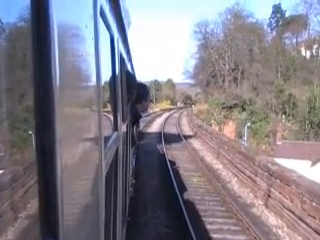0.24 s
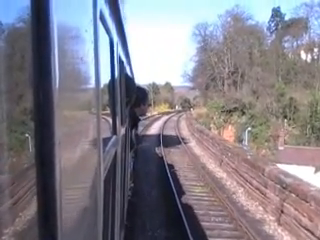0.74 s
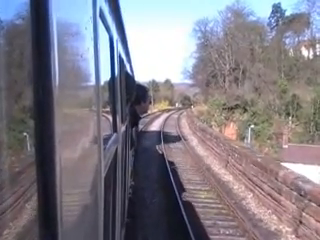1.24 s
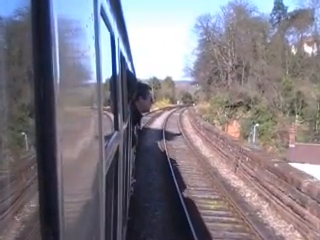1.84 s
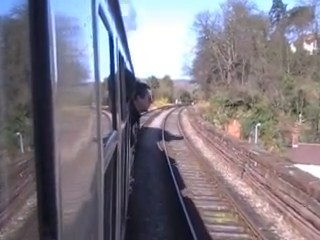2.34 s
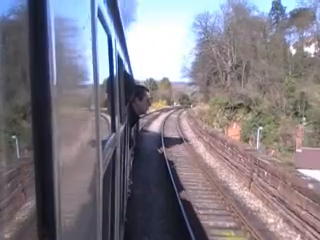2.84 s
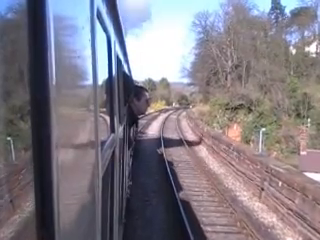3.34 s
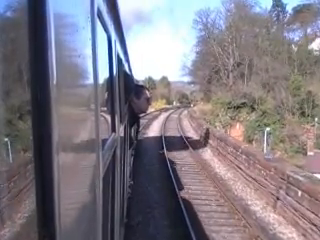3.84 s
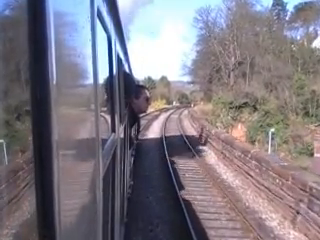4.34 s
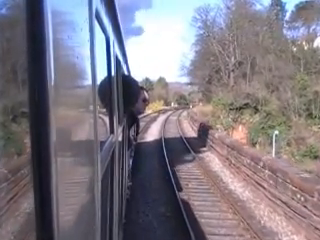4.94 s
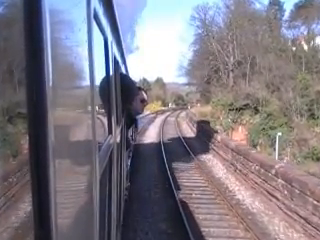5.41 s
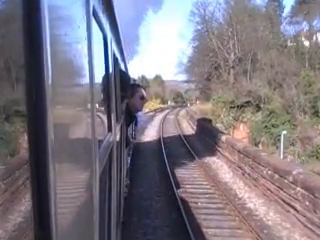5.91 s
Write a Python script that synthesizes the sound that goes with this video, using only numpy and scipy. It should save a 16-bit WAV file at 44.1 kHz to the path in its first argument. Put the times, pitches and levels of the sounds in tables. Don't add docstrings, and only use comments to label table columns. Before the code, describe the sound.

Steam locomotive exhaust beats chuff loudly and steadily, slightly quickening, with steam hiss between, low train rumble and wind buffeting the microphone.

```python
import sys
import numpy as np
from scipy import signal
from scipy.fft import rfft, irfft, next_fast_len
from scipy.io import wavfile
from scipy.ndimage import uniform_filter1d

SR = 44100
rng = np.random.default_rng(int(sys.argv[2]) if len(sys.argv) > 2 else 0)


def master_out(mix):
    frames = np.transpose(np.atleast_2d(mix))
    ceiling = np.clip(frames, -1, 1)
    pcm = np.round(ceiling * 32767).astype(np.int16)
    wavfile.write(sys.argv[1], SR, pcm)


def attenuation_scalar(level_db):
    decades = np.asarray(level_db, float) / 20
    return 10 ** decades


N = 272097
TIME = np.arange(N) / SR
SIZE = next_fast_len(N + SR // 10)
HZ = np.maximum(np.arange(SIZE // 2 + 1) * SR / SIZE, 1)


def rms_one(x):
    return x / np.sqrt(np.mean(x ** 2) + 1e-20)


def in_time(rows):
    s, *columns = np.transpose(rows)
    return [np.interp(TIME, s, c) for c in columns]


def in_pitch(rows):
    hz, *columns = np.transpose(rows)
    return [np.interp(np.log(HZ), np.log(hz), c) for c in columns]


def coloured(x, gain):
    return irfft(rfft(x, SIZE) * gain, SIZE)[..., :N]


def around(s, reach):
    first = max(int((s - reach) * SR), 0)
    last = min(int((s + reach) * SR), N)
    span = slice(first, last)
    return span, TIME[span] - s


def swell(s, rise, hold, fall):
    span, late = around(s, hold + .4)
    return span, 1 / (np.exp(-late / rise) + 1) / (np.exp((late - hold) / fall) + 1)


def drift(rate):
    r = np.exp(-2 * np.pi * rate / SR)
    white = rng.standard_normal(N + SR)
    return rms_one(signal.lfilter([1], [1, -2 * r, r * r], white)[SR:])


def turbulence(spectrum, flutter_db, rate):
    white = rng.standard_normal(N) * attenuation_scalar(flutter_db * drift(rate))
    return rms_one(coloured(white, attenuation_scalar(in_pitch(spectrum)[0])))


def resonate(x, modes):
    out = 0
    for k, (hz, width_hz, db) in enumerate(modes):
        r = np.exp(-np.pi * width_hz / SR)
        top = (1 - r * r) / 2 * np.array([1, 0, -1])
        bottom = [1, -2 * r * np.cos(2 * np.pi * hz / SR), r * r]
        out = out + (-1) ** k * attenuation_scalar(db) * signal.lfilter(top, bottom, x)
    return out


# t/s, swell/s, low blast level/dB, jet hiss level/dB
BEATS = [(0.132, 0.035, -17, -12.5), (0.582, 0.042, -14, -15.5), (1.013, 0.02, -13, -14),
         (1.496, 0.022, -13.5, -17.5), (1.921, 0.032, -16, -11.5), (2.336, 0.024, -13, -17.5),
         (2.763, 0.022, -11.5, -16.5), (3.212, 0.02, -13.5, -15.5), (3.643, 0.029, -15.5, -15.5),
         (4.026, 0.03, -14, -13), (4.423, 0.025, -10.5, -15), (4.861, 0.031, -14.5, -13),
         (5.259, 0.025, -12.5, -12.5), (5.644, 0.038, -14, -16.5), (6.023, 0.027, -11.5, -14.5)]
# t/s, roar level/dB
PUFFS = [
    (0.666, -30.5),
    (.865, -22),
    (1.76, -21.5),
    (2.259, -32.5),
    (3.046, -23),
    (3.105, -31.5),
    (3.44, -27.5),
    (5.062, -26),
    (5.134, -12.5),
]
# f/Hz, width/Hz, level/dB
CHIMNEY = [(204.7, 17, -2.5), (349.3, 25, -1), (574, 82, -16), (707, 23, 1), (860, 210, -9),
           (1134, 25, -2.5), (1306, 27, -9.5)]
# f/Hz, level/dB per Hz
BOOM = [(90, -62), (140, 4.5), (200, 10), (450, 8), (700, 3.5), (1500, -24.5)]
# f/Hz, level/dB per Hz
ROAR = [(200, -22.5), (450, -7.5), (800, -6), (1400, -1.5), (2100, -5.5), (3000, -10.5), (6000, -59)]
# f/Hz, level/dB per Hz
JET = [(1200, -9), (2200, -8), (2800, -0.5), (3500, 5.5), (4100, -2), (5000, -5.5), (5600, -14.5),
       (6300, -1), (6800, -24), (7300, -55.5), (8500, -32), (12000, -53)]
# f/Hz, level/dB per Hz
SIZZLE = [(5500, -21), (6500, 4.5), (7500, 0.5), (8800, -5.5), (10000, -8), (12000, -17)]


def exhaust():
    blasts = []
    for s, rise, low_db, hiss_db in BEATS:
        fade = 0.036 - 0.0017 * s
        blasts.append((s, rise, fade, low_db + 0.44, low_db, hiss_db))
    for s, roar_db in PUFFS:
        blasts.append((s, 0.0053, 0.019, roar_db - 8, roar_db, roar_db - 9.5))
    drive = np.zeros((3, N))
    lag_s = np.array([[0.0035], [0], [0]])
    for s, rise, fade, *levels_db in blasts:
        span, late = around(s, .4)
        late = late - lag_s
        drive[:, span] += attenuation_scalar(levels_db)[:, None] / (np.exp(-late / rise) + np.exp(late / fade))
    boom = turbulence(BOOM, flutter_db=1.0, rate=180)
    roar = turbulence(ROAR, flutter_db=1.5, rate=32)
    jet = turbulence(JET, flutter_db=1.37, rate=150)
    jet = jet + attenuation_scalar(-26.5) * turbulence(SIZZLE, flutter_db=2.5, rate=30)
    low = drive[0] * boom + drive[1] * roar
    return attenuation_scalar(-5.5) * low + attenuation_scalar(8.5) * resonate(low, CHIMNEY) + attenuation_scalar(0.77) * drive[2] * jet


# t/s, level/dB
LEAK = [(0.0, -34.5), (0.45, -33.5), (0.75, -39.5), (1.05, -36.5), (1.35, -42), (2.2, -33.5), (2.55, -37.5),
        (3.1, -37.5), (3.85, -33.5), (4.2, -35.5), (4.75, -36), (5.5, -32.5), (5.8, -36.5), (6.17, -36.5)]


def leaking_steam():
    flow_db, = in_time(LEAK)
    blow_db = np.zeros(N)
    for s, *_ in BEATS[::4]:
        span, late = around(s - 0.14, 0.48)
        blow_db[span] += 2 * 5 / (np.exp(-late / 0.13) + np.exp(late / 0.058))
    change_db = flow_db + 36
    hiss_db = flow_db + blow_db
    roar_db = -37 + 0.21 * change_db + 1.07 * blow_db
    sizzle_db = -51 + 0.97 * change_db + 0.66 * blow_db
    hiss = attenuation_scalar(hiss_db - 0.67) * turbulence(JET, flutter_db=1.55, rate=6.4)
    sizzle = attenuation_scalar(sizzle_db) * turbulence(SIZZLE, flutter_db=.4, rate=20)
    roar = attenuation_scalar(roar_db - 1.5) * turbulence(ROAR, flutter_db=0.5, rate=4.5)
    return hiss + sizzle + roar


# f/Hz, level/dB per Hz
RUMBLE = [(40, -21.5), (100, -11.5), (150, 6.5), (205, 7), (300, 8), (600, 3.5), (900, -1), (1500, -35.5)]
# f/Hz, width/Hz, level/dB
CARRIAGE = [(202.3, 7.9, 9), (363.2, 22, 7), (619, 18, 3.5)]


def train_rumble():
    rumble = attenuation_scalar(-35.5) * turbulence(RUMBLE, flutter_db=-1.5, rate=22)
    return rumble + resonate(rumble, CARRIAGE)


# t/s, peak level/dB, f/Hz, decay/s
TICKS = [
    (.094, -27, 7000, .008),
    (1.645, -33, 8000, .005),
    (4.57, -35, 9500, .003),
    (5.131, -21, 1400, .025),
]


def ticks():
    out = np.zeros(N)
    for s, peak_db, hz, decay in TICKS:
        span, late = around(s, 0.036)
        grit = resonate(rng.standard_normal(len(late)), [(hz, .5 * hz, 6)])
        out[span] += attenuation_scalar(peak_db) * grit * (late > 0) * np.exp(-np.abs(late) / decay)
    return out


# t/s, hold/s, buffeting level/dB, left-right level/dB
GUSTS = [(.08, 0.075, -28, -2), (0.347, 0.17, -23.5, 5), (0.539, .13, -24, -5.5), (0.822, .1, -20, 0.5),
         (0.943, 0.031, -21.5, 2), (0.998, 0.14, -32, 13), (1.23, 0.064, -33.5, 5), (1.411, 0.094, -28, -2),
         (1.698, .13, -29.5, 4.5), (1.87, .04, -31, -9), (2.078, 0.035, -29.5, 13.5),
         (2.153, 0.038, -21.5, 0), (2.708, 0.11, -28, -7.5), (3, 0.13, -25, -3), (3.198, 0.13, -26.5, -1),
         (3.383, 0.078, -26, 12), (3.574, 0.13, -24.5, -3.5), (4.232, 0.11, -33.5, 1),
         (4.406, 0.054, -36.5, 12), (4.615, 0.036, -32, -5), (4.825, 0.081, -40, 9), (5.1, 0.048, -25.5, 0),
         (5.25, 0.081, -39, -4), (5.47, 0.038, -32.5, -6), (5.674, 0.041, -37.5, 0), (5.96, .05, -33.5, 8)]
# t/s, peak level/dB, left-right level/dB, push or pull (+1 or -1)
POPS = [(0.421, -8, 10, 1), (0.557, -5, 14, -1), (0.854, -18, 10, 1), (1.013, -7, 26, -1),
        (1.08, -11, 7, -1), (1.777, -16.5, 26, 1), (2.082, -20, 11, 1), (2.814, 2, 24, 1),
        (3.058, -29, 20, -1), (3.275, -10, 26, -1), (3.337, -5.5, 23, 1), (3.414, -15.5, -14, -1),
        (3.431, -9, 18, 1), (4.236, -16, 19, 1), (5.84, -12.5, 15, -1)]
# f/Hz, level/dB per Hz
BUFFET = [(25, -54), (60, -25), (120, -1), (230, 3.5), (400, 3), (800, -4), (1300, -13), (2500, -41.5)]
# f/Hz, level/dB per Hz
PUSH = [(20, -39.5), (40, -14), (70, -4.5), (120, -0.5), (170, -11), (300, -33.5)]


def wind():
    calm = attenuation_scalar(-40.5 - 1.5 * TIME)
    level = np.array([calm, calm])
    for s, hold, db, side_db in GUSTS:
        span, shape = swell(s, .012, hold, 0.021)
        level[:, span] += np.outer(attenuation_scalar(db + np.array([.5, -.5]) * side_db), shape)
    lumps = np.array([turbulence(BUFFET, flutter_db=3.3, rate=70) for port in range(2)])
    push = np.array([turbulence(PUSH, flutter_db=4.5, rate=5.7) for port in range(2)])
    push = attenuation_scalar(-25.5) * level.mean(axis=0) ** .6 * push
    push = push + 0.41 * push[::-1]
    out = lumps * level + push * attenuation_scalar(np.array([[-1.2], [1.2]]))
    pop_hz = 307
    for s, peak_db, side_db, sign in POPS:
        span, late = around(s, .03)
        bell = np.exp(-(late * pop_hz / 0.47) ** 2)
        pulse = sign * attenuation_scalar(peak_db) * bell * np.cos(2 * np.pi * pop_hz * late + .15)
        out[:, span] += np.outer(attenuation_scalar(np.minimum([side_db, -side_db], 0)), pulse)
    return out


def echoes(x, t60, onset):
    after = np.arange(SR) / SR
    fade = attenuation_scalar(-60 * after / t60) * np.clip(after / onset, 0, 1)
    tail = rng.standard_normal((2, SR)) * fade
    tail = tail / np.sqrt(np.sum(tail ** 2, axis=1, keepdims=True))
    return signal.fftconvolve(x[None], tail)[:, :N]


# f/Hz, left lead/radians, left-right level/dB, scattered share level/dB
PORTS = [(200, 0.56, -2.5, -35), (710, 0.52, 0.5, -7.5), (1220, 0.2, 1.5, -19.5), (1700, .08, 5.5, -20.5),
         (2450, 0.2, 0.5, -12.5), (3225, 0.88, -1.5, -8), (4420, 1.1, -5, -21.5), (4940, 2.65, 0, -1.5),
         (5780, 3.74, 3, -13.5), (6040, 3.63, 2, -24.5), (6226, 3.5, 3.5, -6.5), (6804, 1.8, 1, -2),
         (8010, 3.7, 13, -9.5), (10900, 5.6, 1.5, -65)]


def ports(x, echo):
    lead, balance_db, share_db = in_pitch(PORTS)
    half = attenuation_scalar(balance_db / 2) * np.exp(.5j * lead)
    steps = np.array([half, 1 / half]) / np.cos(np.minimum(lead, 1.3) / 2)
    wander = np.exp(2.5j * np.array([drift(13.2), drift(12.2)]))
    stray = np.real(signal.hilbert(x, SIZE)[:N] * wander)
    return coloured(x + echo, steps) + coloured(stray, steps * attenuation_scalar(share_db))


def scene():
    beats = exhaust()
    echo = attenuation_scalar(-15) * echoes(beats, t60=1, onset=0.014)
    train = beats + leaking_steam() + train_rumble() + ticks()
    return ports(train, echo) + wind()


# f/Hz, level/dB
FAINTEST_KEPT = [(0, -61.5), (90, -70.5), (160, -100), (4800, -100), (5400, -87.5), (7200, -82.5),
                 (9000, -82.5), (11000, -82.5), (11800, -60)]


def lose_faint_bands(x):
    hz, _, cells = signal.stft([x[0] + x[1], x[0] - x[1]], SR, "cosine", 2048)
    power = np.abs(cells / 2) ** 2 + 1e-20
    power_db = 10 * np.log10(power)
    band = np.minimum(np.arange(len(hz)) // 12, 84)
    band_db = 10 * np.log10(np.add.reduceat(power, np.arange(85) * 12, axis=1) / 12)
    jitter_db = 4.5 * rng.standard_normal(band_db.shape)
    band_db = uniform_filter1d(band_db + jitter_db, size=5)
    frame_db = 10 * np.log10(uniform_filter1d(power.sum(axis=(0, 1)), size=3))
    floor_db = np.interp(hz, *np.transpose(FAINTEST_KEPT))[:, None] + .88 * (frame_db + 32.5)
    masked_db = band_db[::-1] - 10.0 + .25 * (frame_db + 30)
    kept = (band_db > masked_db)[:, band] | (hz < 1000)[:, None]
    kept &= (band_db[:, band] > floor_db) & (power_db > floor_db - 2.5)
    mid, side = signal.istft(cells * kept, SR, "cosine", 2048)[1][:, :N]
    return np.array([mid + side, mid - side]) / 2


def top_cut(x):
    return signal.sosfilt(signal.butter(12, 11750, fs=SR, output="sos"), x)


def record(dry):
    bass_cut = signal.butter(2, 48.5, "high", fs=SR, output="sos")
    thin = signal.sosfilt(bass_cut, dry)
    rounded = 1.6 * np.tanh(thin / 1.6)
    mix = np.clip(lose_faint_bands(rounded), -1, 1)
    return top_cut(mix)


dry = scene()
out = record(dry)
master_out(out)
```